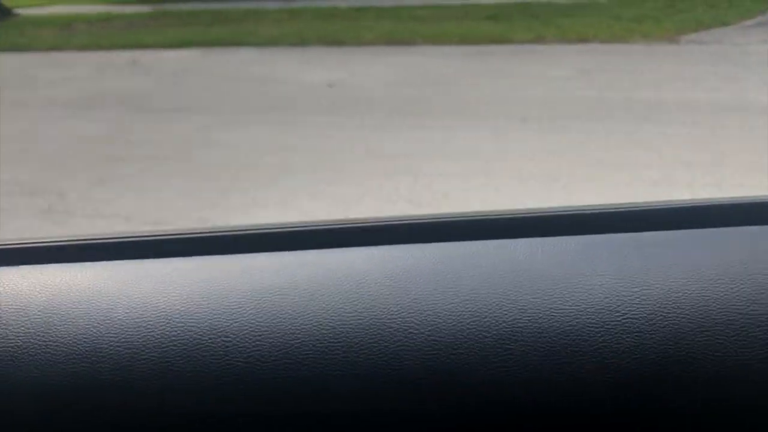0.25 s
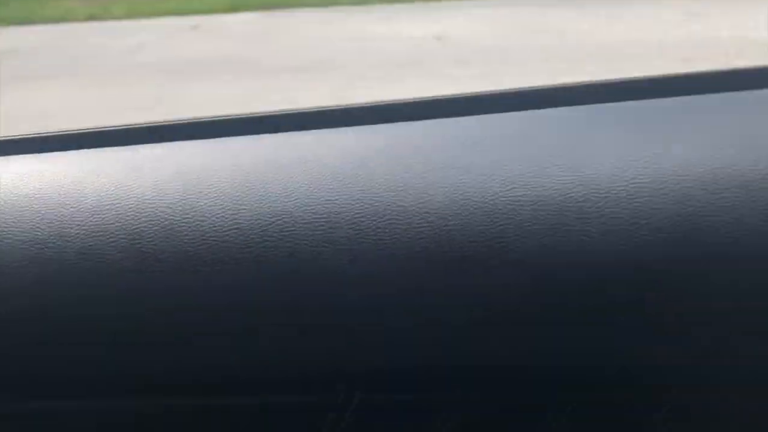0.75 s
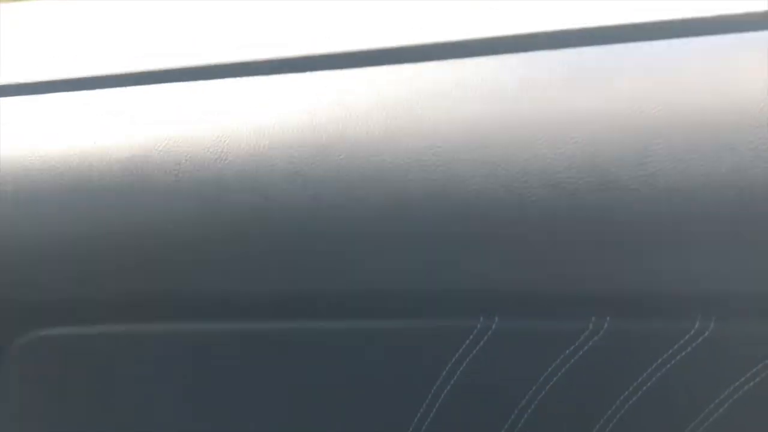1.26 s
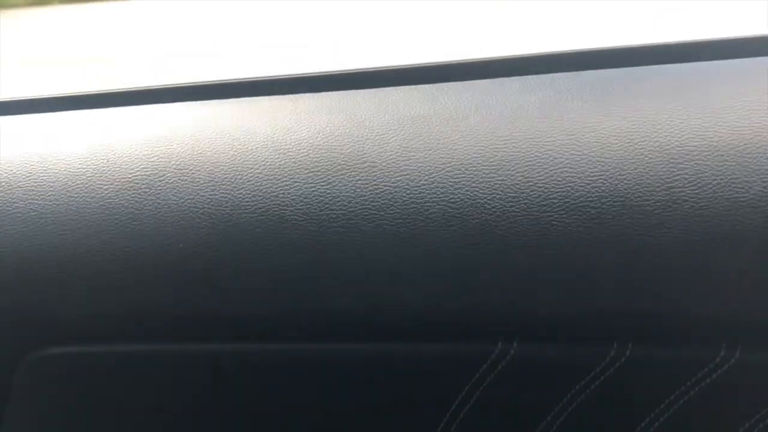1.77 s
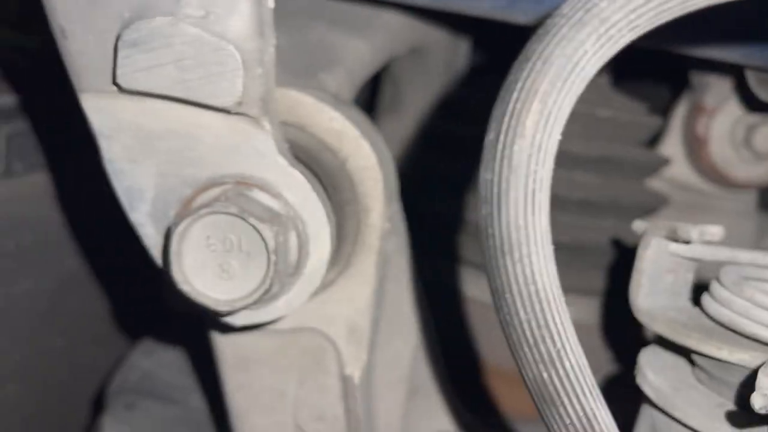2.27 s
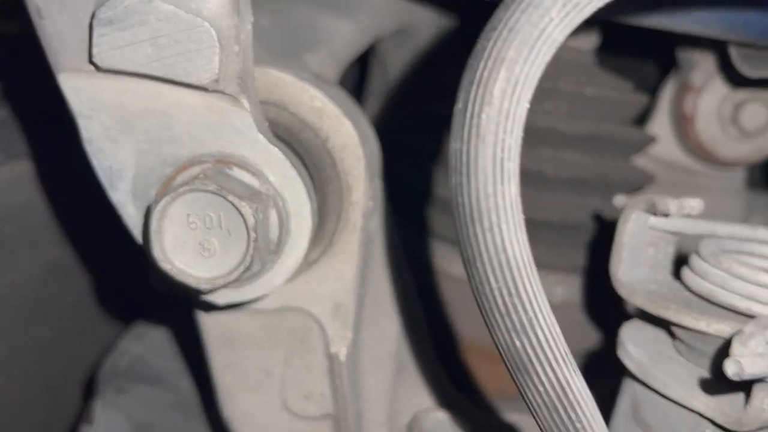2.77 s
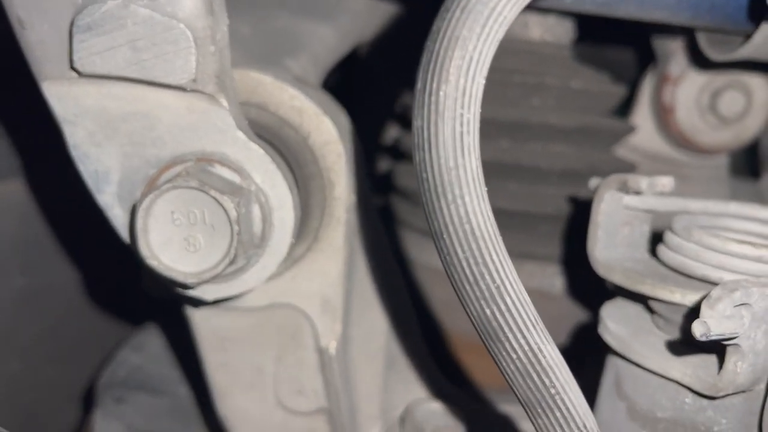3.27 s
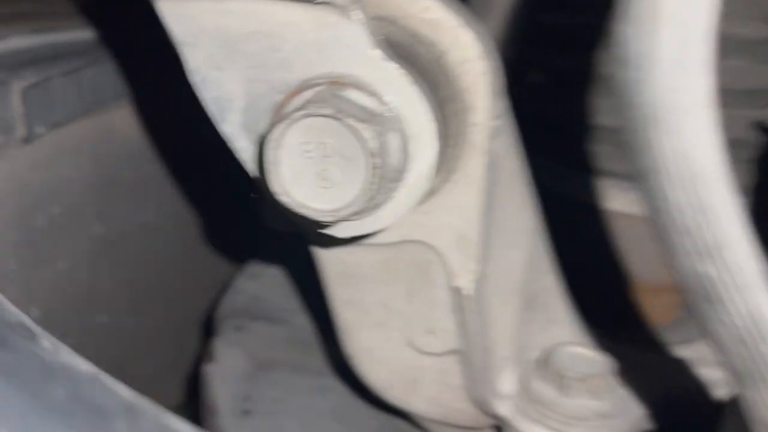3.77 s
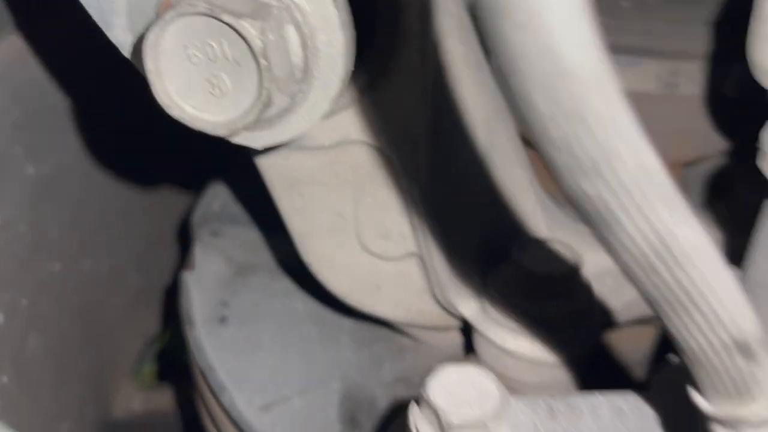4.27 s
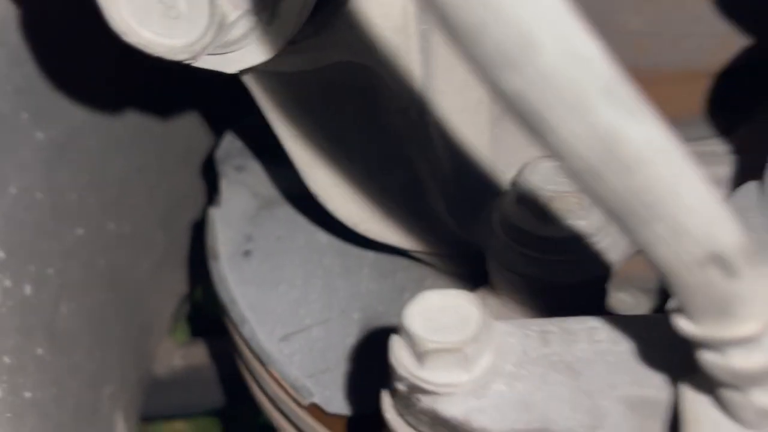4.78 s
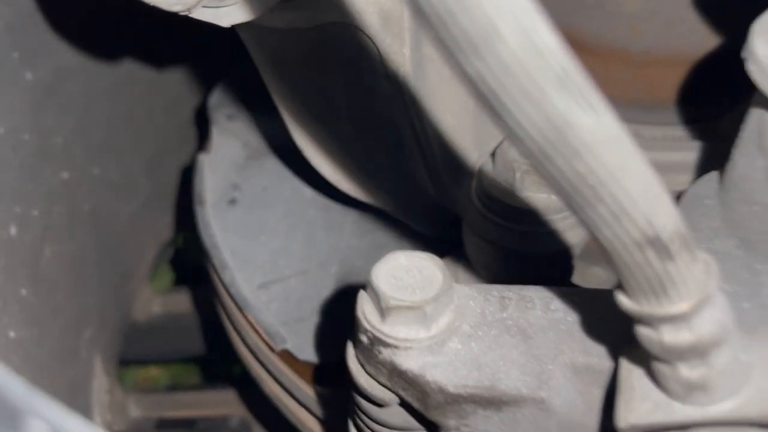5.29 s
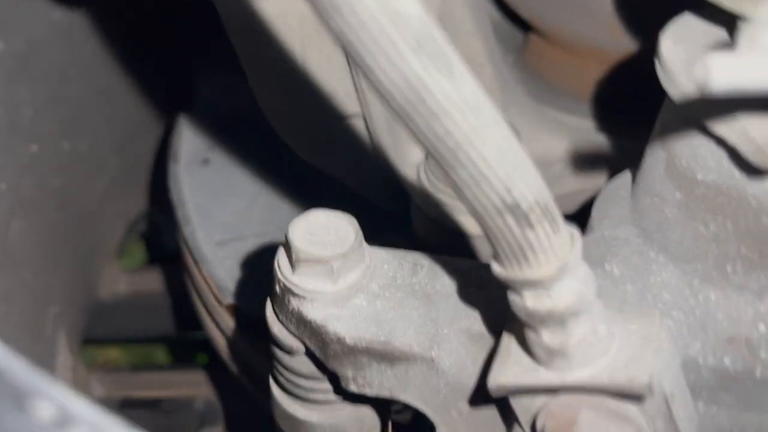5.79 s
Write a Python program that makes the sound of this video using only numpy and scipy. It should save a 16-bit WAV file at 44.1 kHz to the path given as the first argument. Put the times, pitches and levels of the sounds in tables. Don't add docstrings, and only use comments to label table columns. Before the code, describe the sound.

Two places joined by a sudden cut. First a muffled, nearly centred cabin: faint idle, soft thuds, short crackling creaks. Then a close, wide outdoor view under the car: droning exhaust and engine wash, isolated bright metallic clicks, a small rattle, a rapid creaking burst like a ratchet, and finally loud separate snaps. A thin insect chirrs faintly far behind.

```python
import sys
import numpy as np
from scipy import signal
from scipy.fft import rfft, irfft, next_fast_len
from scipy.io import wavfile
from scipy.ndimage import uniform_filter1d

SR = 44100
rng = np.random.default_rng(int(sys.argv[2]) if len(sys.argv) > 2 else 0)


def put_to_file(sound):
    columns = np.atleast_2d(sound).T
    safe = np.clip(columns, -1, 1)
    whole_steps = np.round(safe * 32767)
    wavfile.write(sys.argv[1], SR, whole_steps.astype(np.int16))


def gain_from_db(level_db):
    decades = np.asarray(level_db, float) / 20
    return 10 ** decades


N = 266143
CUT_S = 2.112

# t/s, f/Hz
FIRING_IN = [(0, 52.4), (.5, 52), (.8, 50.4), (1.3, 50.1), (1.6, 50.9), (2.1, 51)]
FIRING_OUT = [(2.13, 49.48), (2.39, 50.54), (2.65, 50.77), (2.91, 50.12), (3.17, 51.4), (3.43, 51.52),
              (3.69, 50.94), (4.21, 50.26), (4.731, 50.47), (4.992, 48.4), (5.25, 47.72), (6.03, 49.4)]
# early level/dB, late level/dB
BOOM_ORDERS = [8, 9, 16, 18, 19, 20, 21, 22, 23, 24, 29, 30]
BOOM = [(-58, -46.5), (-66, -47), (-48.5, -56.5), (-75, -62), (-51, -89), (-48, -60), (-58, -38),
        (-49.5, -40.5), (-47, -39), (-68, -80), (-51, -58), (-62.5, -62)]
# early level/dB, late level/dB
EXHAUST_ORDERS = [8, 9, 10, 13, 14, 15, 16, 17, 18, 19, 20, 21, 22, 23, 24]
EXHAUST = [(-15, -19), (-35, -33), (-38, -36), (-40, -35), (-38, -36), (-31, -36), (-17, -22), (-24, -31),
           (-19, -25), (-16, -18), (-33, -29), (-27, -32), (-29, -27), (-33, -38), (-35, -40)]
CABIN_ORDER, PIPE_ORDER = 21.5, 18.5

# f/Hz, level/dB per Hz
CABIN_HUSH = [(15, -55), (25, -27), (54, -6), (76, -16.5), (144, -7), (227, -27), (266, -25), (590, -37),
              (639, -37), (1540, -46), (3790, -53.5), (5210, -52), (14300, -63)]
# t/s of the top, level/dB, fade/dB per s
JOLTS = [(.05, -51, 250), (.14, -46, 250), (.222, -44.5, 303), (.61, -47.5, 300), (.95, -50, 204),
         (1.122, -49.5, 113), (1.32, -51, 54), (1.84, -59, 301), (1.96, -53, 152), (2.05, -54, 202)]
JOLT_RISE_DB_PER_S = 450
# start t/s, length/s, level/dB, slips per s
CREAKS = [
    (0.887, 0.074, -49.5, 1200),
    (1.083, 0.07, -47, 1200),
    (1.287, 0.07, -48, 1200),
    (1.382, 0.035, -53.5, 1200),
    (0.039, 0.034, -52.5, 400),
    (0.214, 0.03, -58, 500),
    (0.596, .025, -63, 300),
]
# f/Hz, level/dB, time to fade by 60 dB/s
PANELS = [
    [(1020, 0, 0.037), (1550, -11, 0.086), (1840, -10, .045), (2060, -20, 0.22), (2130, -14, .05),
     (3090, -10, .04), (3130, -17, 0.037), (4220, -19, .05), (5400, -16, .04)],
    [(592, -2, 0.08), (750, -5, .05), (990, -7, .05), (1461, -8, .11), (1910, -12, .06), (2040, -22, 0.22),
     (2200, -14, .07), (2470, -18, .05), (2950, -15, 0.056), (4270, -21, .05), (5360, -16, 0.13)],
    [(572, -1.5, 0.057), (1040, -4, 0.029), (1860, -11, .08), (2300, -10, .04), (3004, -10.5, 0.079),
     (3440, -25, .06), (4700, -30, .06), (5680, -18, .05)],
    [(368, 11, 0.035), (715, -3, .05), (1650, -6, .05)],
    [(950, 0, .06), (1580, -6, .04), (1870, -9, .05), (2150, -10, .07), (2465, -7, 0.065), (4230, -15, .07),
     (5790, -11, .04)],
]
PANEL_OF = [0, 1, 2, 4, 3, 3, 3]
# t/s, level/dB
INSECT = [(0, -99), (1.6, -99), (1.65, -72), (2.1, -74), (2.15, -66), (4.6, -64), (6.03, -67)]
INSECT_HZ, THROBS_PER_S, THROB_DB = 3690, 10.3, 4.0

# f/Hz, level/dB against the wash
WHINES = [(333, -21), (499.5, -19.5), (666, -24), (691, -25), (845, -28), (997, -24), (1220, -29),
          (1273, -31), (1550, -33)]
# f/Hz, level/dB per Hz
YARD = [(30, -30), (70, -25), (120, -14), (180, -17), (240, -20), (300, -24), (600, -33), (1200, -42),
        (1800, -52), (3000, -58), (5000, -63), (8000, -60), (9100, -66), (10400, -59), (11600, -72),
        (12600, -100)]
# t/s, level/dB
YARD_SWELL = [(2.11, -22), (2.7, -21.5), (3.25, -18.5), (3.8, -21.5), (4.25, -26.5), (4.7, -28.5),
              (5.2, -26.5), (5.6, -26.5), (6.03, -26)]
# f/Hz, width/Hz, level/dB over the wash
HUMS = [(236, 8, 14), (272, 12, 5), (344, 12, 5), (395, 14, 4), (499, 20, 6), (665, 20, 4), (960, 60, 3),
        (1045, 50, -7), (1102, 10, 9), (3700, 200, 5), (1270, 20, 5)]
HISS_DB = 3

# t/s, peak level/dB, thud level/dB against the ring
SLIPS = [(2.1108, -28, -5), (2.4037, -17.5, -6.5), (2.4245, -31.5, 3), (2.5752, -24, -4),
         (2.7238, -16, -8.5), (2.7603, -28.5, -2.5), (2.7961, -24, -5), (2.8366, -20.5, -6),
         (2.8646, -28.5, 2), (2.8955, -25, -6), (2.9234, -27, -3.5), (2.9518, -24.5, -4),
         (2.9863, -18, -4.5), (4.0402, -16.5, -7.5), (4.0671, -17.5, -7), (4.1078, -15.5, -8.5),
         (4.1465, -17, -8), (4.1901, -18, -7.5), (4.2757, -12, -10.5), (4.391, -11.5, -11.5),
         (4.5518, -13, -9.5), (5.2566, -10.5, -13), (5.3677, -17, -10.5), (5.5314, -9.5, -11),
         (5.6252, -18, -7), (5.7163, -15.5, -8), (5.8006, -19, -5), (5.8784, -13.5, -9),
         (5.9403, -21.5, -7), (6.0086, -16, -7.5)]
# t/s, peak level/dB over the ringing, thud level/dB against the ring
BUZZ = [(3.0114, -21, -1), (3.038, -19.5, -4.5), (3.0609, -17.5, -3.5), (3.0839, -16.5, -4),
        (3.1078, -18, -3), (3.1304, -21, -4), (3.1547, -18, -2), (3.1777, -17.5, -3), (3.1986, -16.5, -5),
        (3.2186, -15, -4.5), (3.2394, -17.5, -5.5), (3.26, -15, -5), (3.2804, -21.5, -3),
        (3.3009, -14, -4.5), (3.3194, -23, -5), (3.3388, -13, -5), (3.3564, -17, -4), (3.3754, -14.5, -3),
        (3.3944, -17.5, -8), (3.4136, -11.5, -5.5), (3.4344, -14, -5), (3.456, -12, -3),
        (3.4754, -14.5, -4.5), (3.4974, -13.5, -5), (3.5184, -15.5, -5), (3.5374, -15.5, -5),
        (3.5544, -17.5, -5), (3.5718, -10.5, -6), (3.5964, -14, -6), (3.6167, -13, -6), (3.6354, -17.5, -4),
        (3.6561, -11.5, -7), (3.6744, -17, -7), (3.695, -10.5, -8.5), (3.7134, -19.5, -5),
        (3.7344, -11.5, -6.5), (3.7524, -19.5, -4), (3.7733, -11, -9), (3.7964, -13.5, -6),
        (3.8172, -12.5, -6.5), (3.8414, -13, -7.5), (3.8614, -12, -7.5), (3.8886, -10, -9.5),
        (3.9104, -15.5, -12), (3.933, -10.5, -7.5), (3.9579, -11.5, -8), (3.9828, -12.5, -8),
        (4.0073, -12.5, -8)]
PILE_UP_DB = -5
# f/Hz, level/dB, time to fade by 60 dB/s
STEEL_MODES = [(500, -2, .2), (730, -6, .08), (1030, -3, .25), (1102, -1, .2), (1421, -4, .12), (1535, -1, .12),
               (1750, -7, .15), (1955, -3.5, .14), (2110, -3, .09), (2560, -13, .1), (2920, 3, .06),
               (3200, -9, .1), (4155, -8, .09), (4330, -5, .045),
               (6060, -17, .12), (6450, -13, .1), (5318, -3, .09), (5420, -9, .07), (5641, -10, .09),
         (6325, -15, .16), (6630, -10, .15), (7213, -7, .1), (7342, -5, .14), (7487, -9, .15),
               (8074, -5, .12), (8484, -6, .15), (8828, -8, .15), (9453, -9, .15), (9668, -6, .12),
         (10232, -6, .1), (10540, -5, .1), (10658, -2, .13), (10745, 0, .13), (10831, 0, .15),
         (10960, -4, .1)]
# f/Hz, level/dB per Hz
BODY = [(400, -5), (700, -27), (1100, -3.5), (1600, -13), (2200, -9), (3300, -13), (4600, -13),
        (6000, -13.5), (8000, -10.5), (9200, -4.5), (9900, -4.5), (10800, -12), (12000, -12), (12600, -31),
        (14000, -32), (16000, -46)]
# f/Hz, time to fade by 60 dB/s
FADE = [(500, 0.13), (1300, 0.43), (3500, 0.15), (9000, 0.19), (12000, 0.075)]
# f/Hz, delay/s, length/s, level/dB against the thud
ARRIVALS = [(1060, .0045, .002, -5.5), (1480, .0065, .002, -8), (2110, .0075, .002, -6),
            (2950, .005, .002, -15), (4350, .007, .002, -17), (450, .011, .0025, -4), (700, .009, .002, -9),
            (1080, .0135, .0025, -9), (2000, .016, .002, -14)]
CRACK_DB, CRACK_S, EARLY_S = 1.5, .0008, .001
CREEP = {500: 2, 730: 2, 1421: -2, 1535: -2, 2560: 3, 4155: -2, 4330: 4, 5318: 1.5, 5641: -4, 6060: 4, 6450:
         -3, 6630: 1, 7213: -1, 7342: 2}
CREEP_FROM_S, CREEP_TO_S, CREEP_REACH_S = 2.6, 5.8, .7
# f/Hz, t/s, loss/dB per s away from it
HALFWAY = (2920, 3.5, 5)
PHASE_SLIP = .15

# t/s, low level/dB, middle level/dB, high level/dB
KNOCKS = [
    (2.4195, -31, -15.5, -34),
    (2.432, -18, -27, -32),
    (2.452, -18, -19, -26),
    (2.4745, -16.5, -21, -22),
    (2.494, -24, -40, -27),
    (2.509, -23, -40, -31),
    (2.522, -25, -37, -38),
]
# f/Hz, level/dB, time to fade by 60 dB/s
LOOSE = [
    [(1090, 0, .06), (985, -5, .04)],
    [(1890, 0, .045), (1560, -9, .05), (2050, -9, .15), (2190, -10, .05), (2420, -16, .05)],
    [(3560, -7, .05), (3910, -14, .05), (3050, -9, .03)],
]

# f/Hz, phase/radians
LEAD = [(0, 0), (2000, .05), (2600, .7), (4200, 1.1), (4800, 3.14), (5700, 6.28), (6200, 6.28),
        (8950, 9.42), (9350, 9.42), (11500, 12.57), (22050, 12.57)]
# f/Hz, likeness 0 to 1
ALIKE = [(150, 1), (300, .96), (600, .72), (1200, .92), (2000, .97), (3200, .6), (4200, .5), (4800, .9),
         (6000, .97), (7800, .88), (8800, 1), (9500, 1), (10600, .88), (11600, .86)]
# f/Hz, level/dB
LEAN = [(60, 0), (250, 1.6), (700, 5.5), (1100, 3.5), (1500, 1), (2500, 1.1), (5000, 2)]


def evened(x):
    return x / np.sqrt(np.mean(x ** 2) + 1e-20)


def read(points, hz):
    f, value = np.transpose(points)
    return np.interp(np.log(hz + 1), np.log(f + 1), value)


def follow(rows):
    times, values = np.transpose(rows)
    return np.interp(np.arange(N) / SR, times, values)


def wander(top_hz):
    steps = rng.standard_normal(400)
    return np.interp(np.arange(N) / SR * top_hz * 2, np.arange(400), steps) * 1.9


def wash(spectrum, patchy_db, hums=()):
    frames, hz = N // 1024 + 5, np.fft.rfftfreq(4096, 1 / SR)
    a, b, patches = rng.standard_normal((frames, 2049, 3)).T
    patches = evened(uniform_filter1d(uniform_filter1d(patches, 28, 0), 3, 1))
    colour_db = read(spectrum, hz)
    for f, width, db in hums:
        colour_db = colour_db + db / (1 + (2 * (hz - f) / width) ** 2)
    z = (a + 1j * b) * gain_from_db(colour_db[:, None] + patchy_db * patches)
    return signal.istft(z, nperseg=4096, noverlap=3072)[1][:N]


def band_rms(x, lo_hz, hi_hz):
    power, hz = abs(rfft(x)) ** 2, np.fft.rfftfreq(len(x), 1 / SR)
    return np.sqrt(2 * power[(hz > lo_hz) & (hz < hi_hz)].sum()) / len(x)


def ring(modes, seconds, rise, turns=None):
    t = np.arange(int(seconds * SR)) / SR
    turns = rng.random(len(modes)) if turns is None else turns
    out = np.zeros(len(t))
    for (hz, db, t60), turn in zip(modes, turns):
        out += gain_from_db(db - 60 * t / t60) * np.sin(2 * np.pi * (hz * t + turn))
    return out * (1 - np.exp(-t / rise))


def engine(firing, orders, strengths, start, end, unsteady_db, resonance):
    cycles = np.cumsum(uniform_filter1d(follow(firing), 6000) / 8) / SR
    late = np.clip((np.arange(N) / SR - start) / (end - start), 0, 1)
    out = np.zeros(N)
    for k, (early_db, late_db) in zip(orders, strengths):
        level = gain_from_db(early_db + (late_db - early_db) * late + unsteady_db * wander(3.0))
        lag = .5 * (k > resonance) + .035 * wander(2.5)
        out += np.sqrt(2) * level * np.sin(2 * np.pi * (k * (cycles + 0.28) - lag))
    return out


def jolts():
    t = np.arange(int(CUT_S * SR)) / SR
    power = np.zeros(len(t))
    for s, db, fade in JOLTS:
        drop_db = np.maximum(JOLT_RISE_DB_PER_S * (s - t), fade * (t - s))
        power += gain_from_db(db - drop_db) ** 2
    level = np.pad(np.sqrt(power), (0, N - len(t)))
    colour = [(80, -20), (200, 7.0), (350, -0.5), (700, -10.5), (1500, -28.0), (4000, -36.0)]  # Hz, dB
    return evened(wash(colour, 2.1)) * level * gain_from_db(3.5)


def trim():
    out = np.zeros(N)
    i = np.arange(SR // 5)
    for (s, length, db, rate), panel in zip(CREAKS, PANEL_OF):
        chance, size = rng.random((2, SR // 5))
        weaken = np.clip(1.6 - i / (length * SR), 0, 1) * (i < length * SR)
        train = (chance < rate / SR) * gain_from_db(3.3 * size + 1.5) * weaken
        train[0] = 3.0
        rustle = rng.standard_normal(900) * gain_from_db(2.5 - np.arange(900) * 60 / SR / .03)
        answer = ring(PANELS[panel], .3, 0.0004)
        answer[:900] += signal.lfilter([.25], [1, -.8], rustle)
        sound = signal.fftconvolve(train, answer)
        strength = np.sqrt(np.mean(sound[:int(length * SR)] ** 2))
        out[int(s * SR):][:len(sound)] += gain_from_db(db) * sound / strength
    return out


def insect():
    t = np.arange(N) / SR
    throb_db = THROB_DB * np.cos(2 * np.pi * THROBS_PER_S * (t - 1.75))
    level_db = follow(INSECT) + 1.5 * wander(9.) + throb_db
    return gain_from_db(level_db) * np.sin(2 * np.pi * (INSECT_HZ * t + .02 * wander(15.)))


def cabin():
    hush = wash(CABIN_HUSH, 1.6)
    hush = hush / band_rms(hush, 194, 760) * gain_from_db(-53.5)
    boom = engine(FIRING_IN, BOOM_ORDERS, BOOM, 0, CUT_S, 1.0, CABIN_ORDER)
    return boom + hush + jolts() + trim() + insect()


def whines():
    t = np.arange(N) / SR
    lines = np.zeros(N)
    for hz, db in WHINES:
        level = gain_from_db(db) * (1 + .25 * wander(6.))
        lines += level * np.sin(2 * np.pi * (hz * t + .12 * wander(5.)))
    return np.sqrt(2) * lines * gain_from_db(follow(YARD_SWELL))


def yard():
    noise = wash(YARD, 1.6, HUMS)
    noise = noise / band_rms(noise, 142.5, 400)
    rumble = signal.sosfiltfilt(signal.butter(2, 1200, fs=SR, output="sos"), noise)
    hiss = noise - rumble
    return (rumble + gain_from_db(HISS_DB) * hiss) * gain_from_db(follow(YARD_SWELL))


def underbody(clear):
    hz, t, z = signal.stft(rng.standard_normal(SR // 3), SR, nperseg=128)
    decay = gain_from_db(-60 * t / read(FADE, hz)[:, None]) + gain_from_db(-39.0 - 60 * t / 0.53)
    dense = signal.istft(z * gain_from_db(read(BODY, hz))[:, None] * decay, SR, nperseg=128)[1][:len(clear)]
    both = evened(dense) + gain_from_db(-1) * evened(clear)
    t = np.arange(len(both)) / SR

    thud = signal.sosfilt(signal.butter(4, 4500, fs=SR, output="sos"), both)
    thud = thud * (1 - np.exp(-t / 0.00077)) * (1 + 0.1 * np.exp(-((t - .006) / 0.0017) ** 2))
    thud = thud / np.sqrt(uniform_filter1d(thud ** 2, 300).max())
    for f, s, length, db in ARRIVALS:
        thud = thud + 2 * gain_from_db(db) * np.exp(-((t - s) / length) ** 2) * np.sin(2 * np.pi * f * t)

    high = signal.sosfilt(signal.butter(4, 4500, "high", fs=SR, output="sos"), both)
    high = high * (1 - np.exp(-t / 0.00064)) * (1 + gain_from_db(CRACK_DB) * np.exp(-t / CRACK_S))
    return [part / np.sqrt(uniform_filter1d(part ** 2, 300).max()) for part in (thud, high)]


def bushing(slips, count=5):
    s, peak_db, thud_db = slips.T
    at = ((s - EARLY_S) * SR).astype(int)
    stations = np.linspace(CREEP_FROM_S, CREEP_TO_S, count)
    nearness = np.exp(-((s[:, None] - stations) / CREEP_REACH_S) ** 2)
    share = nearness * (1 + 2.2 * rng.random((len(s), count)))
    share = share + 0.18 * rng.random((len(s), count))
    share /= np.linalg.norm(share, axis=1, keepdims=True)

    steel, out = np.array(STEEL_MODES), np.zeros(N)
    creep = np.array([CREEP.get(hz, 0) for hz in steel[:, 0]])
    turns = rng.random(len(steel))
    for k, station in enumerate(stations):
        modes = steel + [[5, 2, 0]] * rng.uniform(-1, 1, steel.shape)
        modes[:, 0] *= 1 + .002 * rng.uniform(-1, 1, len(steel))
        halfway_loss = (steel[:, 0] == HALFWAY[0]) * HALFWAY[2] * abs(station - HALFWAY[1])
        modes[:, 1] += creep * (station - 4) - halfway_loss
        starts = turns + PHASE_SLIP * rng.standard_normal(len(steel))
        answers = underbody(ring(modes, .33, 0.0021, starts))
        levels_db = (peak_db + thud_db - 0.6, peak_db - 3.5)
        for answer, db in zip(answers, levels_db):
            train = np.zeros(N)
            train[at] = gain_from_db(db) * share[:, k]
            out += signal.oaconvolve(train, answer)[:N]
    return out


def knocks():
    out = np.zeros(N + SR)
    for s, *strengths_db in KNOCKS:
        for db, modes in zip(strengths_db, LOOSE):
            sound = gain_from_db(db) * ring(modes, .15, 0.002)
            out[int(s * SR):][:len(sound)] += sound
    return out[:N]


def ports(direct, other):
    size = next_fast_len(N)
    hz = np.fft.rfftfreq(size, 1 / SR)
    alike, lean = np.clip(read(ALIKE, hz), 0, 1), gain_from_db(read(LEAN, hz) / 2)
    turn = np.exp(.5j * np.interp(hz, *np.transpose(LEAD)))
    a, b = rfft(direct, size), rfft(other, size)
    left = a * turn * lean
    right = (alike * a + np.sqrt(1 - alike ** 2) * b) / turn / lean
    return irfft(np.array([left, right]), size)[:, :N]


def wheel():
    hum = engine(FIRING_OUT, EXHAUST_ORDERS, EXHAUST, 3.1, 5.46, 1.0, PIPE_ORDER)
    slips = np.r_[SLIPS, np.add(BUZZ, [0, PILE_UP_DB, 0])]
    whine = whines()
    direct = hum + whine + yard() + bushing(slips) + knocks() + insect()
    other = np.roll(whine, 3000) + yard() + bushing(slips, count=2) + knocks()
    return ports(direct, other)


def scene():
    t = np.arange(N) / SR
    fade_out = np.clip((CUT_S - .016 - t) / 0.00059, .25, 1) * (t < CUT_S)
    fade_in = np.clip((t - CUT_S) / 0.0025, 0, 1)
    return cabin() * fade_out + wheel() * fade_in


def starve(pair, under_db):
    z = signal.stft(np.array([pair[0] + pair[1], pair[0] - pair[1]]) / 2, nperseg=1024)[2]
    bands = (abs(z[:, 96:512]) ** 2).reshape(2, 26, 16, -1).mean(2)
    mood_db = 5 * evened(uniform_filter1d(rng.standard_normal(bands.shape), 3))
    usual = bands[:, :12].sum(0).mean(0)
    keep = bands > usual * gain_from_db(under_db + mood_db) ** 2
    z[:, 96:512] *= np.repeat(keep, 16, axis=1)
    mid, side = signal.istft(z, nperseg=1024)[1][:, :N]
    return np.array([mid + side, mid - side])


def low_pass(x):
    return signal.sosfilt(signal.butter(12, 14840, fs=SR, output="sos"), x)


def record(dry):
    limited = np.tanh(1.112 * dry)
    mix = starve(limited, under_db=-24.0)
    return low_pass(mix)


dry = scene()
out = record(dry)
put_to_file(out)
```